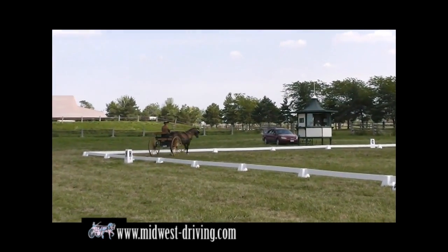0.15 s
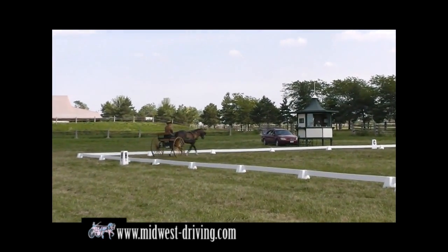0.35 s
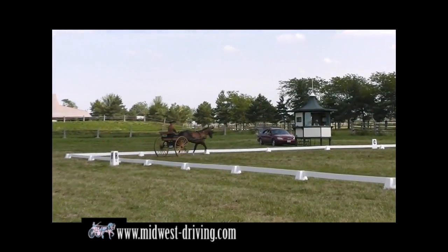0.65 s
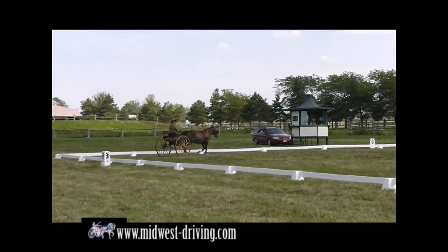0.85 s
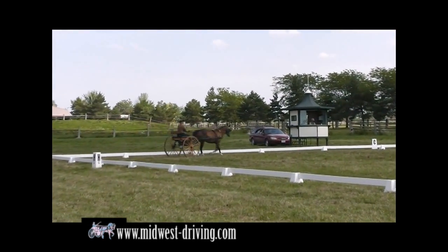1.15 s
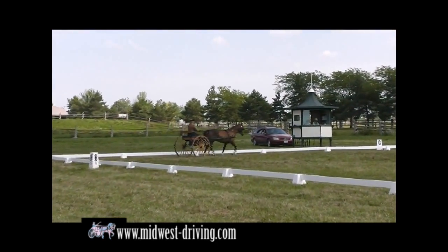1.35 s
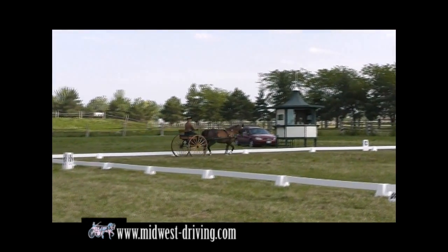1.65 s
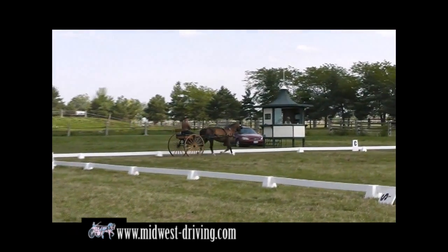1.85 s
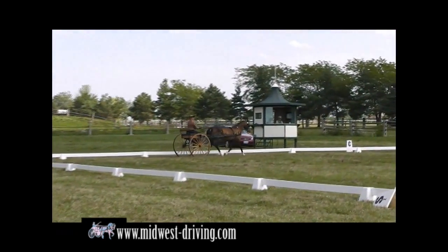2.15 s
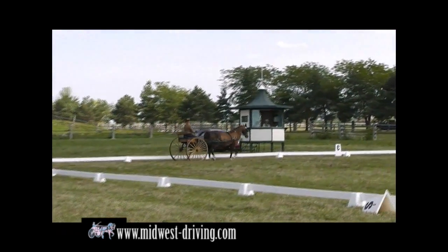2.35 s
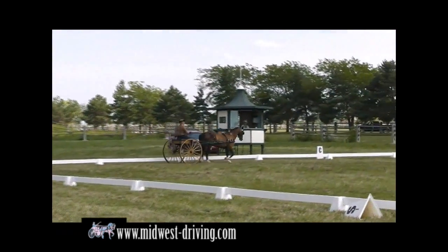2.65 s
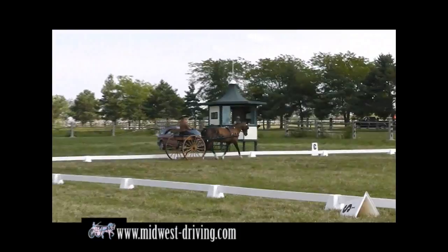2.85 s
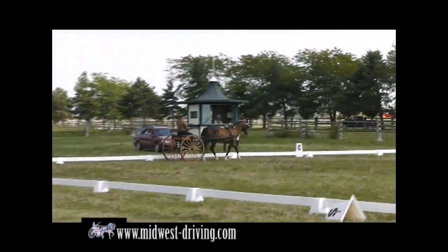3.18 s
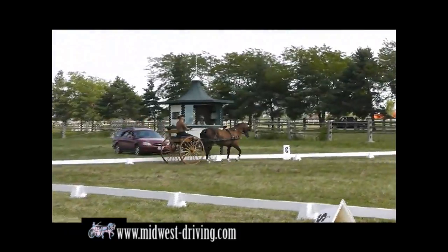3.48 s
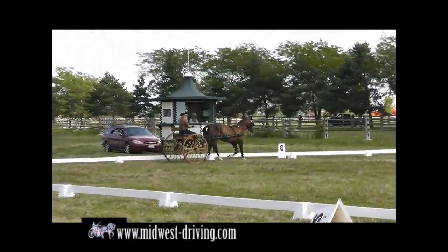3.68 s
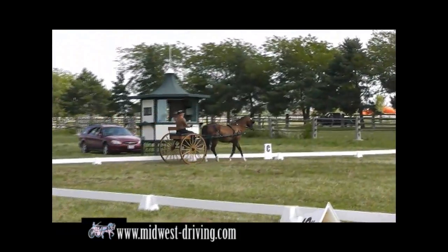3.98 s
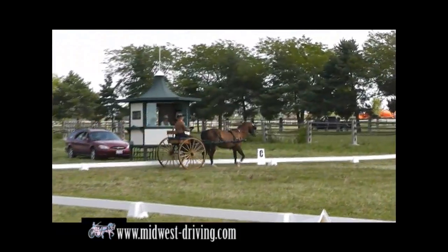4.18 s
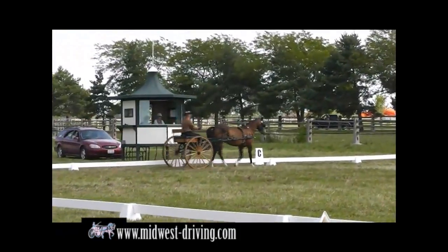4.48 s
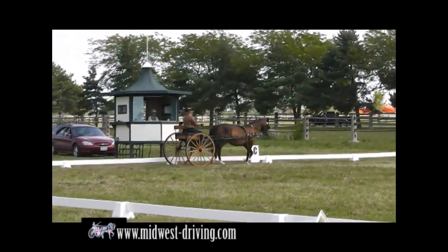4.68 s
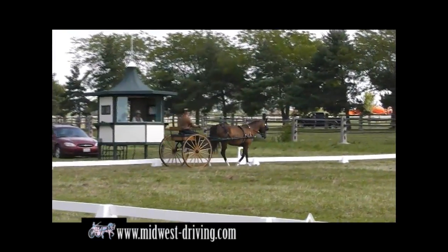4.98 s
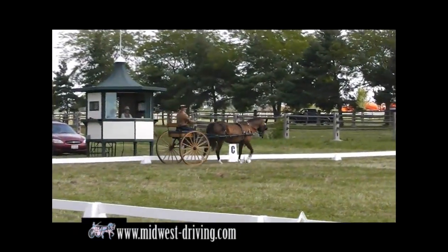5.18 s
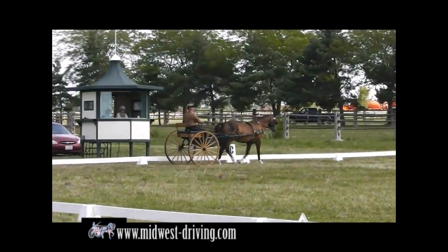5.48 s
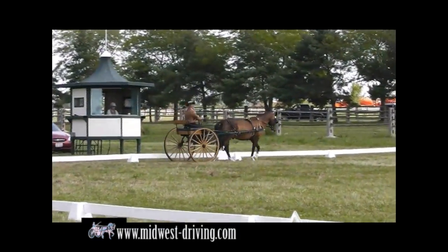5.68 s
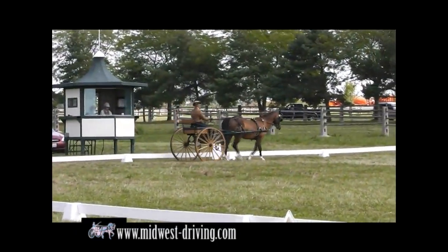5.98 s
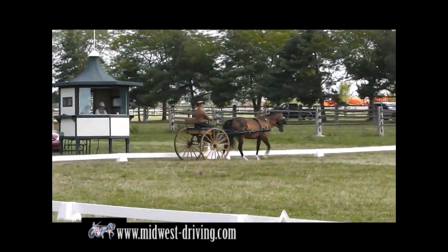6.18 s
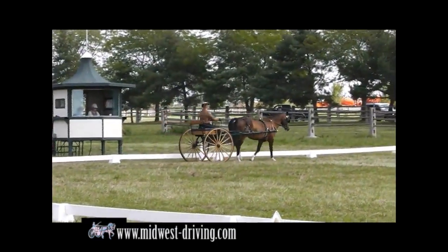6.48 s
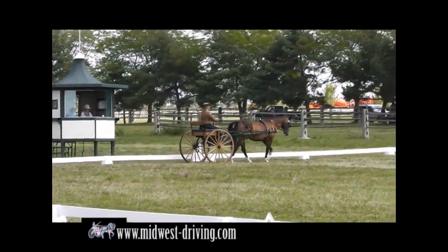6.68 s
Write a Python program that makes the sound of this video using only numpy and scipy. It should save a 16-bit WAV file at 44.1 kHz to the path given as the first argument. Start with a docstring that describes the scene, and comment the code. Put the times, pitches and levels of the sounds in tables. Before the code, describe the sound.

Steady low aircraft drone sinking slightly in pitch, gusty wind buffeting, high insect chirps on the right, tiny bird notes, and one clear harness click late.

```python
"""Distant propeller plane over a grass field

A drone of exhaust and propeller lines, roar and rasp sinks slowly in pitch; a delayed ground echo combs it.
Gusts thump the microphone ports: low noise plus single eddies. Grass noise rustles, far insects hiss.
Two bush-crickets sing gliding tones; a grasshopper and field crickets are banded noise.
Birds call in thin slurred notes; a horse cart's harness clicks as short noise bursts."""
import sys
import numpy as np
from scipy import signal
from scipy.fft import rfft, irfft, next_fast_len
from scipy.io import wavfile
from scipy.ndimage import uniform_filter1d, map_coordinates

SR = 44100
rng = np.random.default_rng(int(sys.argv[2]) if len(sys.argv) > 2 else 0)


def inscribe(sig):
    """Save sig as 16-bit PCM at rate SR to the path in sys.argv[1].

    A 1-D sig is mono; a 2-D sig holds one channel per row.
    Samples are clipped to [-1, 1] before scaling.
    """
    pcm = np.round(np.clip(np.atleast_2d(sig).T, -1, 1) * 32767)
    wavfile.write(sys.argv[1], SR, pcm.astype(np.int16))


N = 301203  # samples

# Spectra: f/Hz, relative density/dB. Levels apply before panning and echo.

# grass rustle spectrum: f/Hz, density/dB
RUSTLE_SPECTRUM = [(1800, -16), (2800, 3.5), (4000, 8.5), (5300, 2), (7000, -48), (12000, -30)]
# grass swishes: t/s, peak/dB
SWISHES = [(.62, -71), (.98, -64.5), (1.66, -69), (2.42, -76), (3.1, -72), (4.03, -68), (4.36, -65),
           (4.53, -66), (4.85, -64), (4.97, -65), (5.12, -71), (5.5, -67), (5.92, -64), (6.03, -66),
           (6.14, -68), (6.28, -64.5), (6.58, -61.5)]
# far insect chorus spectrum: f/Hz, density/dB
CHORUS_SPECTRUM = [(6800, -39), (7700, -5), (8300, 0.5), (8800, 2.5), (9400, -6), (10200, -16),
                   (12000, -58)]
# even hiss spectrum: f/Hz, density/dB
HISS_SPECTRUM = [(2000, -5), (5500, 2.5), (7500, -0.5), (10500, 0), (12500, -3.5), (14500, -4.5),
                 (15600, -10.5)]
RUSTLE_START_DB, RUSTLE_RISE_DB_PER_S = -71, -0.02
SWISH_HALF_S = 0.062

# field cricket band: f/Hz, density/dB
TRILL_SPECTRUM = [(3600, -45), (4350, -12), (4700, 2), (4950, -3), (5600, -45)]
# field crickets, underlying part: t/s, level/dB
TRILL_LEVEL = [(0, -77), (2.2, -78), (2.5, -75), (3.5, -76), (4, -74), (5.2, -72.5), (5.7, -73), (6, -67),
               (6.83, -71.5)]
# moments when the field cricket band surges: t/s, peak/dB
TRILL_SURGES = [(3.59, -68), (3.87, -68), (4.02, -64), (4.3, -75), (4.53, -69), (6.3, -65), (6.58, -67)]
SURGE_HALF_S = 0.04

# grasshopper leg on wing: f/Hz, density/dB
LEG_FILE_SPECTRUM = [(8500, -17), (9800, -4), (10600, -4), (11800, -9), (13000, -17), (15500, -24)]
# grasshopper bouts: t/s, peak/dB
BOUTS = [(.17, -66), (.37, -71), (.51, -66), (.85, -65.5), (1.14, -67), (1.58, -68), (1.86, -70),
         (2.02, -69), (2.76, -75), (3.42, -69)]
BOUT_HALF_S = 0.078

# near bush-cricket, uneven tempo: t/s, chirps sung so far
CHIRP_TEMPO = [(.07, 0), (.783, 3), (1.54, 6), (2.486, 10), (2.995, 12), (3.698, 15), (4.752, 19),
               (5.436, 22), (6.178, 25), (6.662, 27)]
CHIRP_DB, CHIRP_SCATTER_DB = -44, 1  # full voice, before stroke effort; spread between chirps
WARM_UP_DB, WARM_UP_S = 3.5, 2.4  # initial shortfall; time to full voice
STROKE_GAP_S = 0.0088

# bird notes: t/s, length/s, start f/Hz, end f/Hz, low partial level/dB, octave level/dB
BIRD_NOTES = [(0.037, .03, 5000, 4750, -64, -61), (.335, .04, 5400, 5300, -65, -72),
              (.388, .049, 5250, 5100, -67, -57), (.58, .075, 4000, 3100, -66, -85),
              (1.115, .039, 4970, 5250, -71, -57), (1.655, .04, 4150, 4050, -65, -85),
              (2.058, .05, 6900, 6400, -69, -85), (2.312, 0.028, 5450, 5130, -56, -59),
              (3.055, .032, 5100, 5200, -67, -64), (4.886, .035, 4450, 3570, -58, -80),
              (4.943, .022, 3350, 3920, -59, -80), (6.226, .034, 5280, 5480, -60, -59),
              (6.251, .032, 5190, 5080, -61, -54), (6.695, .04, 5950, 5700, -68, -67)]

# harness clicks: t/s, relative level/dB
CLICKS = [(.8854, -57), (1.448, -57), (3.6344, -58), (5.832, -32)]
# click spectrum: f/Hz, gain/dB
CLICK_SPECTRUM = [(300, -40), (900, 0), (1700, 21), (2200, 6), (2900, -6), (4000, 2), (5300, -4),
                  (6800, 7.5), (9000, -7), (11500, -5), (15500, -23)]

# wind buffeting: t/s, relative level/dB
BUFFET_LEVEL = [(0, -19), (.3, -27), (.48, -30), (.7, -25), (1.0, -32.5), (1.45, -32.5), (1.75, -31),
                (2.3, -32), (2.7, -31), (3.05, -35), (3.65, -32.5), (3.95, -37.5), (4.25, -32.5),
                (4.8, -38.5), (5.1, -32), (5.7, -41), (6.55, -31), (6.83, -34)]
# buffeting spectrum: f/Hz, density/dB
RUMBLE_SPECTRUM = [(8, -12), (25, 5.5), (55, -3.5), (100, -6), (160, -23.5), (300, -36), (900, -70),
                   (3000, -120)]
# eddies at the ports: t/s, core level/dB, pitch f/Hz, left-right level/dB
EDDIES = [(.032, -6, 47.7, 4), (0.092, -11, 61, 1), (.148, -6, 56, 1), (0.188, -12.5, 50, 2),
          (.276, -3.5, 54, -6), (.316, -4.5, 86, 0), (.344, -12, 50, 0), (.567, -6.5, 67, 0.5),
          (.614, -15.5, 47, 5), (0.666, -5, 61, 5), (.686, -6, 45, 3.5), (0.764, -13, 36, -1),
          (.832, -16, 44, 4), (1.175, -25, 43, 13), (1.681, -23, 37, -4), (1.739, -21, 35, -1),
          (1.777, -24, 46, 1), (1.952, -21, 31, 4), (2.096, -9.5, 46, 6.5), (2.112, -13.5, 36, -14.5),
          (2.161, -18.5, 44, -8), (2.438, -20.5, 40, -11), (2.53, -24, 45, 7), (2.63, -15, 47, 0),
          (2.714, -19.5, 28, -8), (2.907, -17.5, 33, -2), (3.193, -20, 38, 3), (3.27, -20, 36, -3),
          (3.635, -16, 70, 4), (3.649, -8.5, 68, 0), (3.67, -11, 56, 9), (3.691, -9, 56, 3.5),
          (3.8, -11.5, 54, 2), (4.228, -24, 40, 8), (4.288, -27, 40, 5), (4.585, -24, 36, -1),
          (5.065, -20, 48, 10), (5.122, -22, 36, 0), (5.176, -23, 36, 3), (6.061, -18, 40, 2),
          (6.244, -20, 33.8, 5), (6.384, -23.5, 34, 1), (6.498, -20, 44, 9), (6.582, -18, 31, -4),
          (6.639, -6.5, 42, 2.5)]
# turbulence inside an eddy: f/Hz, density/dB
SWIRL_SPECTRUM = [(30, 10.5), (90, 9), (150, -2.5), (260, -9), (400, -25), (1000, -54), (3000, -120)]
BUFFET_GAIN_DB, BUFFET_FLUTTER_DB = 1.5, 2
PORT_LAG_S = 0.0032  # left port after right

# exhaust lines: multiple of firing rate, relative level/dB
EXHAUST_LINES = [(2, -9.5), (3, -2.5), (6, -5), (8, -26.5), (12, -13)]
# exhaust line level: t/s, level/dB
EXHAUST_LEVEL = [(0, -38), (.4, -44), (.85, -43), (1.6, -41.5), (2.3, -48), (3.0, -41.5), (4.15, -43),
                 (5.5, -44), (6.1, -44.5), (6.83, -56)]
# propeller lines: multiple of blade rate, relative level/dB
PROPELLER_LINES = [(1, 2), (2, 0.5), (3, -8), (5, -8.5), (6, -10), (7, -11.5), (8, -10), (11, -21),
                   (12, -14.5)]
# propeller line level: t/s, level/dB
PROPELLER_LEVEL = [(0, -55), (.4, -41.5), (1.5, -53), (3.9, -54.5), (4.3, -42.5), (5.3, -43), (6, -46),
                   (6.5, -41), (6.83, -43)]
# drone swell on its way through the air (mean removed in use): t/s, level/dB
SWELL_LEVEL = [(0, -37.5), (.33, -36.5), (.65, -40), (1.4, -36), (1.8, -37.5), (2.0, -39.5), (2.3, -39.5),
               (2.5, -37.5), (2.77, -39.5), (3.0, -35.5), (3.6, -37.5), (4.08, -33.5), (4.3, -36),
               (4.65, -38), (5.15, -34), (5.45, -36.5), (6.07, -33), (6.25, -35), (6.83, -34.5)]
# beating hum: t/s, fifth exhaust line level/dB, fourth propeller line level/dB
HUM_LEVELS = [(0, -43, -45), (.63, -42.5, -45), (.71, -49, -51), (.87, -44.5, -47), (.95, -52, -53),
              (1.03, -43, -45), (1.3, -43.5, -46), (1.6, -41, -45), (2.25, -51, -53), (2.6, -48, -52),
              (3.0, -40.5, -49), (3.4, -39.5, -47), (3.6, -46, -50), (4.05, -38, -49), (4.5, -40, -52),
              (5.2, -37.5, -51), (5.55, -39.5, -52), (6.1, -36.5, -51), (6.45, -35.5, -50),
              (6.83, -42, -52)]
# roar spectrum: f/Hz, density/dB
ROAR_SPECTRUM = [(40, -27), (90, -7), (170, 1), (270, -2.5), (360, 1.5), (520, -3), (720, 0), (900, -3.5),
                 (1100, -11), (1400, -11.5), (2000, -33), (3000, -59), (6000, -120)]
# rasp spectrum: f/Hz, density/dB
RASP_SPECTRUM = [(600, -64), (1100, 3), (1350, -2), (1650, 1), (1950, -3.5), (2150, -8.5), (2350, -16.5),
                 (2700, -23), (3500, -34), (9000, -120)]
# rasp level, also carries the whine: t/s, level/dB
RASP_LEVEL = [(0, -42.5), (.22, -50), (.43, -46), (.63, -49.5), (1.25, -45.5), (1.65, -45), (1.87, -49.5),
              (2.2, -50.5), (2.42, -46), (2.72, -51), (2.9, -45.5), (3.27, -44), (3.45, -49), (3.6, -44.5),
              (3.85, -48), (4.02, -41.5), (4.2, -47.5), (4.42, -43), (4.65, -46.5), (4.82, -42),
              (5.55, -49.5), (5.95, -42), (6.3, -46), (6.75, -44)]
# blade tip whine: multiple of blade rate, relative level/dB
WHINE_LINES = [(16, 3), (17, -5.5), (17.6, -1.5), (18, -8.5), (19, -3.5), (21, -10.5)]
# blade tip flare lines: multiple of blade rate, relative level/dB
FLARE_LINES = [(16, 6), (17.6, -7.5), (18, 3), (19, -7), (20, -5.5)]
# blade tip flares: t/s, peak/dB
FLARES = [(1.55, -52), (3.2, -63)]
# ground echo: t/s, delay/s
GROUND_DELAY = [(0, 0.0044), (1.8, 0.0048), (3.8, 0.0054), (5.8, 0.005766), (6.83, 0.006)]
FIRING_START_HZ, SAG_HZ_PER_S = 85.4, 0.71
BLADE_RATIO = 1.2354  # blade passes per firing
FIRST_THROB_S = 0.025  # first crest of the hum beat
EXHAUST_SWING, PROPELLER_SWING = 0.95, 1.03  # shares of the swell
ROAR_DB = -35  # at mean swell
WHINE_START_DB, WHINE_RISE_DB_PER_S = -15, 0.81  # against the rasp level
FLARE_HALF_S = 0.21

TOP_HZ = 15700


def amp(db):
    """Decibels to gain."""
    return 10 ** (np.asarray(db) / 20)


def unit(x):
    """Scale to rms 1."""
    return x / np.sqrt(np.mean(x ** 2) + 1e-20)


def seconds():
    """Time of each sample."""
    return np.arange(N) / SR


def curves(rows):
    """One interpolated curve per column after the time."""
    s, *columns = np.transpose(rows)
    return [np.interp(seconds(), s, column) for column in columns]


def swells(rows, half_s):
    """Sum of bell-shaped swells, one per (t/s, peak/dB) row."""
    return sum(amp(db) / (1 + ((seconds() - s) / half_s) ** 2 / 2) ** 2 for s, db in rows)


def wobble(rate_hz):
    """Smooth random curve, rate_hz knots a second."""
    knots = rng.standard_normal(int(N * rate_hz / SR) + 4)
    return map_coordinates(knots, [np.arange(N) * rate_hz / SR])


def filtered(x, response):
    """Multiply the zero-padded spectrum of x by response(hz)."""
    m = next_fast_len(N + SR // 2)
    return irfft(rfft(x, m) * response(np.fft.rfftfreq(m, 1 / SR)), m)[..., :N]


def coloured(x, spectrum):
    """Shape x by (f/Hz, dB) points on a log axis."""
    f, db = np.transpose(spectrum)
    return filtered(x, lambda hz: amp(np.interp(np.log(hz + 1), np.log(f), db)))


def noise(spectrum, side_db, patchy_db):
    """Stereo noise of rms 1 with drifting gain patches; side_db sets its width."""
    z = signal.stft(rng.standard_normal((2, N)), nperseg=1024)[2]
    field = uniform_filter1d(rng.standard_normal(z.shape[1:]), size=6, axis=0)
    field = uniform_filter1d(field, size=20, axis=1)
    patchy = signal.istft(z * amp(patchy_db * unit(field)), nperseg=1024)[1][:, :N]
    mid, side = coloured(patchy, spectrum)
    side = amp(side_db) * side
    return unit(np.array([mid + side, mid - side]))


def pan(left_db):
    """Channel gains for a left-right difference."""
    return amp([[left_db / 2], [-left_db / 2]])


def add(track, s, sound):
    """Mix a sound into a track from time s."""
    start = round(s * SR)
    lo, hi = np.clip([start, start + sound.shape[-1]], 0, N)
    track[..., lo:hi] += sound[..., lo - start:hi - start]


def glide(length_s, start_hz, end_hz):
    """Phase and rounded envelope of a short gliding note."""
    u = np.linspace(0, 1, round(length_s * SR))
    phase = 2 * np.pi * np.cumsum(start_hz + (end_hz - start_hz) * u) / SR
    return phase, np.abs(np.sin(np.pi * u))


def meadow():
    """Grass rustles and swishes as banded noise, under a far insect chorus and an even hiss."""
    steady = amp(RUSTLE_START_DB + RUSTLE_RISE_DB_PER_S * seconds())
    stirring = np.hypot(steady, swells(SWISHES, SWISH_HALF_S))
    grain = amp(1.35 * wobble(150)) * noise(RUSTLE_SPECTRUM, side_db=-8, patchy_db=2.0)
    rustle = pan(2.4) * stirring * unit(grain)
    chorus = pan(0.82) * amp(-67.5) * noise(CHORUS_SPECTRUM, side_db=-6.5, patchy_db=2.0)
    hiss = amp(-65.5) * noise(HISS_SPECTRUM, side_db=0.0, patchy_db=1.5)
    return rustle + chorus + hiss


def field_crickets():
    """Many distant trills merge into one narrow buzzing band that surges now and then."""
    trill_db, = curves(TRILL_LEVEL)
    level = np.hypot(amp(trill_db), swells(TRILL_SURGES, SURGE_HALF_S))
    buzz = amp(2.7 * wobble(110)) * noise(TRILL_SPECTRUM, side_db=-7, patchy_db=5.5)
    return pan(5.4) * level * unit(buzz)


def far_cricket():
    """A fainter bush-cricket repeats one falling stroke."""
    song = np.zeros(N)
    for s in np.arange(0, N / SR, 0.057):
        phase, swell = glide(0.0158, 8950 + rng.normal(0, 80), 8250)
        stroke = amp(-64.0 + rng.normal(0, 1.0)) * swell * np.sin(phase)
        add(song, s + rng.normal(0, 0.0027), stroke)
    return song * pan(-2)


def grasshopper():
    """Leg scraped on wing: bouts of dry treble sizzle."""
    scrape = amp(1.7 * wobble(120)) * noise(LEG_FILE_SPECTRUM, side_db=-10, patchy_db=0.0)
    return pan(1.1) * swells(BOUTS, BOUT_HALF_S) * unit(scrape)


def chirp(song_db, count):
    """A run of count + 1 uneven wing strokes that gather force, then weaken and sag in pitch."""
    strokes = np.zeros(N)
    for k in range(count + 1):
        effort = min(1, 0.66 + k / 3.7, (count - k + 0.5) / 3.3)
        hz = 8930 + 310 * effort + rng.normal(0, 30)
        phase, swell = glide(0.0075, hz + 130, hz - 170)
        arch = 0.23 * np.sin(np.linspace(-np.pi, np.pi, len(phase)))  # wing fastest in mid stroke
        stroke = swell * np.sin(phase + arch + rng.uniform(0, 2 * np.pi))
        add(strokes, k * STROKE_GAP_S + rng.normal(0, 0.00016), amp(song_db) * effort * stroke)
    return strokes


def near_cricket():
    """A bush-cricket on the right, about four chirps a second, softer at first."""
    song = np.zeros(N)
    times, sung = np.transpose(CHIRP_TEMPO)
    for s in np.interp(np.arange(sung[-1] + 1), sung, times):
        shortfall_db = WARM_UP_DB * max(0, 1 - s / WARM_UP_S)
        db = CHIRP_DB - shortfall_db + rng.normal(0, CHIRP_SCATTER_DB)
        add(song, s, chirp(db, count=7))
    return song * amp([[-11], [0.3]])


def bird():
    """Thin slurred notes: a gliding, quavering partial and its octave."""
    song = np.zeros(N)
    for s, length_s, start_hz, end_hz, low_db, octave_db in BIRD_NOTES:
        phase, swell = glide(length_s, start_hz, end_hz)
        quaver_hz = 70 * wobble(254)[:len(phase)]
        phase = phase + 2 * np.pi * np.cumsum(quaver_hz) / SR
        add(song, s, swell * (amp(low_db) * np.sin(phase) + amp(octave_db) * np.sin(2 * phase)))
    return song


def harness():
    """Dry clicks: coloured noise bursts that die within a few milliseconds."""
    clicks, t = np.zeros((2, N)), np.arange(SR // 30) / SR
    envelope = amp(-60 * t / 0.013) * (1 - np.exp(-t / 0.00071))
    for s, db in CLICKS:
        crack = rng.standard_normal(len(t)) + 0.5 * rng.standard_normal((2, len(t)))
        add(clicks, s, amp(db + 6.5) * crack * envelope)
    return pan(-2) * coloured(clicks, CLICK_SPECTRUM)


def wind():
    """Lumpy low buffeting, plus sharp-cored eddies that push, pull and swirl at each port."""
    buffet_db, = curves(BUFFET_LEVEL)
    rumble = amp(BUFFET_FLUTTER_DB * wobble(15)) * noise(RUMBLE_SPECTRUM, side_db=-2.0, patchy_db=-2.5)
    ports = amp(buffet_db + BUFFET_GAIN_DB) * unit(rumble)
    stir = np.zeros((2, N))
    t = np.arange(-SR // 10, SR // 10) / SR
    for s, db, hz, left_db in EDDIES:
        u = 2 * np.pi * hz * (t - PORT_LAG_S * np.array([[0.5], [-0.5]]))
        vortex = amp(db) * pan(left_db) / (1 - 1j * u / 2) ** 3
        lean = rng.uniform(0, 2 * np.pi) + np.array([[0], [0.9]])  # each port has its own angle
        add(ports, s + t[0], np.real(vortex * np.exp(1j * lean)))
        add(stir, s + t[0], np.abs(vortex))
    swirl = amp(-9.5) * stir * noise(SWIRL_SPECTRUM, side_db=0.5, patchy_db=-2.5)
    return pan(0.54) * (ports + swirl)


def partials(hz, orders, fade_db, fade_rate, smear):
    """Lines at multiples of hz; turbulent air fades each and shifts its phase, high ones most in phase."""
    phase = 2 * np.pi * np.cumsum(hz) / SR
    lines = np.zeros(N)
    for k, db in orders:
        drift = smear * np.sqrt(k) * wobble(11) + rng.uniform(0, 2 * np.pi)
        lines += np.sqrt(2) * amp(db + fade_db * wobble(fade_rate)) * np.cos(k * phase + drift)
    return lines


def hum(firing_hz, blade_hz):
    """Exhaust and propeller lines about 5 Hz apart throb; the air wavers their phases alike."""
    drift = 0.62 * wobble(20) + rng.uniform(0, 2 * np.pi)
    tone = np.zeros(N)
    for hz, db in zip((5 * firing_hz, 4 * blade_hz), curves(HUM_LEVELS)):
        phase = 2 * np.pi * (np.cumsum(hz) / SR - hz[0] * FIRST_THROB_S)
        tone += np.sqrt(2) * amp(db + 1.5 * wobble(22)) * np.cos(phase + drift)
    return tone


def ground_echo(x, delay_s, strength, dull_hz):
    """Grass returns a dull copy; its delay grows as the plane climbs the sky."""
    echo = filtered(x, lambda hz: 1 / (1 + (hz / dull_hz) ** 2))
    n = np.arange(N)
    return x + strength * np.array([np.interp(n - delay_s * SR, n, side) for side in echo])


def plane():
    """Exhaust, propeller and roar share a swell; hum and rasp have their own levels; whine tracks rasp."""
    t = seconds()
    firing_hz = FIRING_START_HZ - SAG_HZ_PER_S * t  # sinks as the plane passes
    blade_hz = firing_hz * BLADE_RATIO
    level_db, = curves(SWELL_LEVEL)
    swell_db = level_db - level_db.mean()
    exhaust_db, = curves(EXHAUST_LEVEL)
    propeller_db, = curves(PROPELLER_LEVEL)
    rasp_db, = curves(RASP_LEVEL)
    air_db = 1.02 * wobble(22)  # moving air flutters roar and rasp together

    exhaust = partials(firing_hz, EXHAUST_LINES, fade_db=1.0, fade_rate=16, smear=0.3)
    exhaust *= amp(exhaust_db + EXHAUST_SWING * swell_db)
    propeller = partials(blade_hz, PROPELLER_LINES, fade_db=2, fade_rate=16, smear=0.2)
    propeller *= amp(propeller_db + PROPELLER_SWING * swell_db)
    roar = noise(ROAR_SPECTRUM, side_db=-19.5, patchy_db=1.05)
    roar *= amp(ROAR_DB + swell_db + 0.5 * air_db)

    chop = 1 + 0.045 * np.cos(2 * np.pi * np.cumsum(blade_hz) / SR)  # each blade sheds a puff
    rasp = amp(rasp_db + air_db) * chop * noise(RASP_SPECTRUM, side_db=-12.5, patchy_db=1.5)
    whine = partials(blade_hz, WHINE_LINES, fade_db=2.5, fade_rate=16, smear=0.24)
    whine *= amp(WHINE_START_DB + WHINE_RISE_DB_PER_S * t + rasp_db)
    flare = partials(blade_hz, FLARE_LINES, fade_db=2, fade_rate=45, smear=0.35)
    whine += swells(FLARES, FLARE_HALF_S) * flare

    low = pan(1.84) * (hum(firing_hz, blade_hz) + exhaust + propeller + roar)
    high = pan(2.9) * (rasp + whine)
    return ground_echo(low + high, curves(GROUND_DELAY)[0], strength=0.57, dull_hz=810)


def scene():
    """Open field: all sources summed, no wall reflections."""
    insects = field_crickets() + far_cricket() + grasshopper() + near_cricket()
    return meadow() + insects + bird() + harness() + wind() + plane()


def record(dry):
    """Sharp band limit: only content below TOP_HZ passes."""
    return filtered(dry, lambda hz: hz < TOP_HZ)


dry = scene()
out = record(dry)
inscribe(out)
```